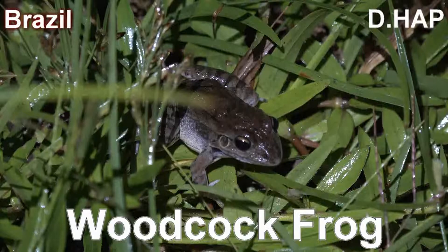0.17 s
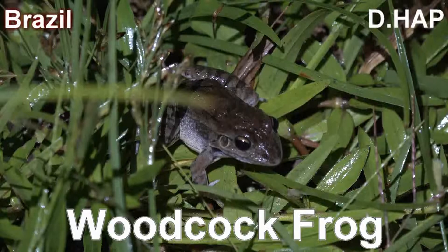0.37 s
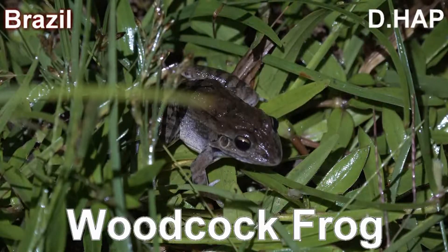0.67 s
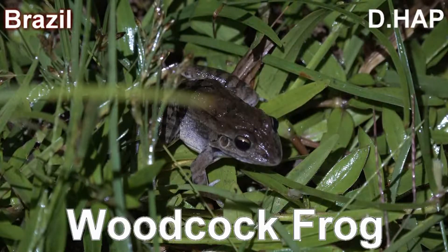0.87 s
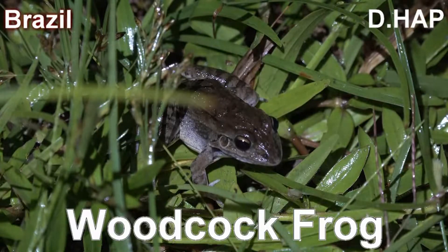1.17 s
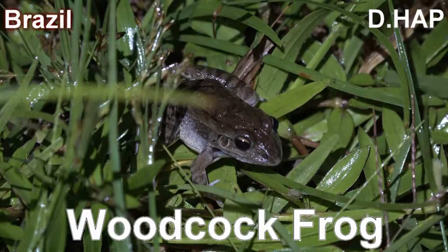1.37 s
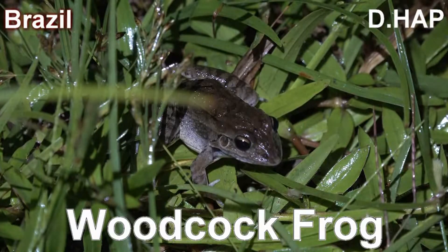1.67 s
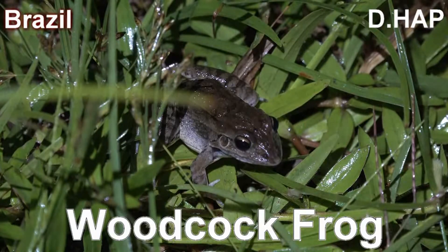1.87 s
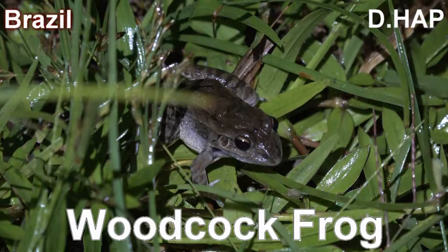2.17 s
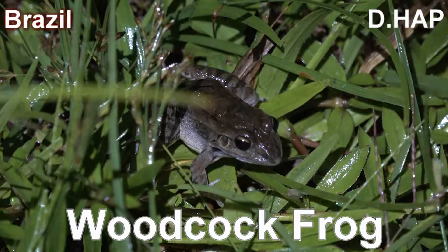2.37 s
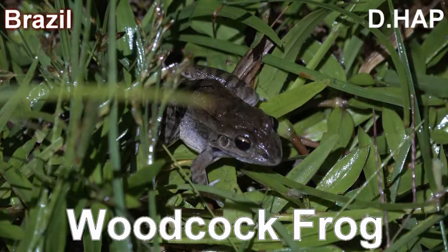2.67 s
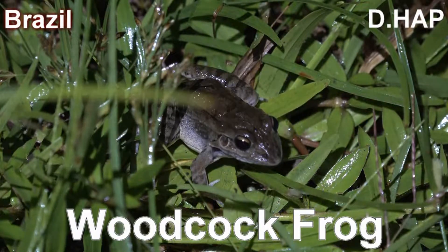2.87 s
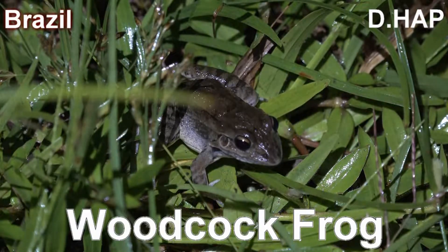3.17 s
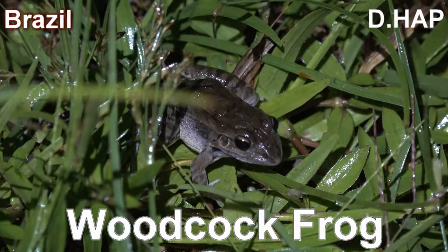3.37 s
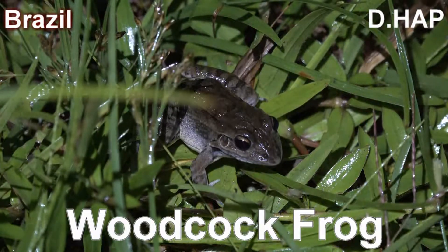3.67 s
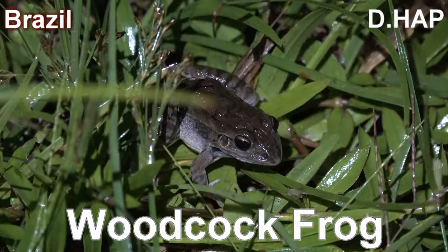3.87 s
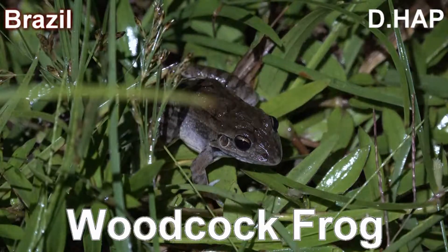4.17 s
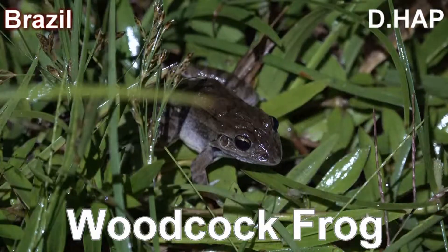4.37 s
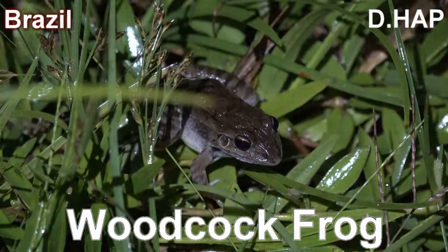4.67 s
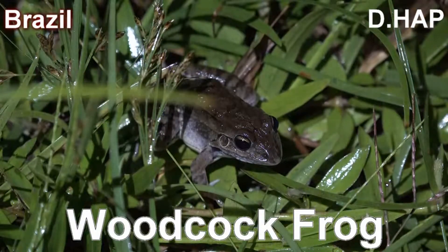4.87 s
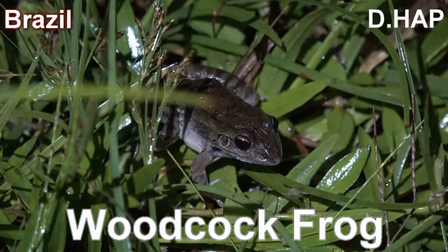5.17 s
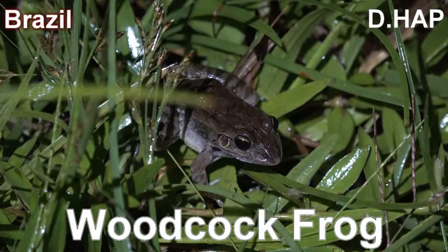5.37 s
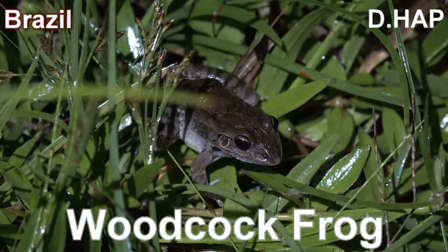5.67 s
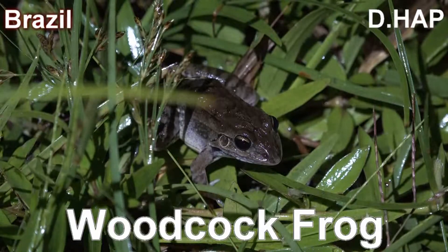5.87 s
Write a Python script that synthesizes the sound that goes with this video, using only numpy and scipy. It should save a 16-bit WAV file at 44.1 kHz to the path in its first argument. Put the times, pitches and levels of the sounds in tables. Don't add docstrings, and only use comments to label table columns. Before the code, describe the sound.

Steady high-pitched cricket and katydid chorus in wet grass at night, with two short upward frog whistles, about a second apart, late on.

```python
import sys
import numpy as np
from scipy import signal
from scipy.fft import rfft, irfft
from scipy.io import wavfile
from scipy.ndimage import uniform_filter1d

SR = 44100
rng = np.random.default_rng(int(sys.argv[2]) if len(sys.argv) > 2 else 0)


def transcribe(u):
    v = np.clip(np.atleast_2d(u).T, -1, 1)
    q = np.round(v * 32767).astype(np.int16)
    wavfile.write(sys.argv[1], SR, q)


def ratio_of_db(decibels):
    return 10 ** (np.asarray(decibels, float) / 20)


N = 265923
TIME = np.arange(N) / SR

# crest t/s, level/dB
WHISTLES = [
    (3.737, -28),
    (4.825, -28),
]
# cancelled f/Hz, level/dB
GROUND_ECHO = (1395, -3.5)
# delay t/s, level/dB
TREE_ECHOES = [
    (.05, -26),
    (.072, -29),
]


def near_frog():
    calls = sum(near_call(*row) for row in WHISTLES)
    notch_hz, echo_db = GROUND_ECHO
    delay_s = 1.5 / notch_hz
    calls = calls + ratio_of_db(echo_db) * np.interp(TIME - delay_s, TIME, calls)
    trees = sum(ratio_of_db(db) * np.interp(TIME - s, TIME, calls) for s, db in TREE_ECHOES)
    return ratio_of_db(-3) * (placed(calls, pan_db=-4, lead=3.2, wet_db=-22, t60=.3) + trees)


# t/s from the crest, f/Hz
WHISTLE_PITCH = [(-.038, 900), (-.013, 1100), (0, 1285), (.013, 1590), (.052, 2160), (.075, 2420)]
MURMUR_S, MURMUR_DB, SWELL_S, SWELL_DB = .021, -36, .017, -24
SETTLE_S, SETTLE_DB, SUSTAIN_S, SUSTAIN_DB = .018, -6, .034, -6.5
STOP_S, STOP_DB, TRAIL_S, TRAIL_DB = .004, -17, .018, -24


def near_call(s, db):
    moments = np.cumsum([-MURMUR_S - SWELL_S, MURMUR_S, SWELL_S, SETTLE_S, SUSTAIN_S, STOP_S, TRAIL_S])
    gains = ratio_of_db(np.array([MURMUR_DB, SWELL_DB, 0, SETTLE_DB, SUSTAIN_DB, STOP_DB, TRAIL_DB]))
    hz = np.interp(TIME - s, *np.transpose(WHISTLE_PITCH))
    envelope = np.interp(TIME - s, moments, gains ** .5) ** 2
    return envelope * whistle(s + moments[0], moments[-1] - moments[0], db, hz)


def whistle(s, length, level_db, hz):
    tone = np.sqrt(2) * np.sin(2 * np.pi * np.cumsum(hz) / SR)
    return ratio_of_db(level_db) * tone * (TIME > s) * (TIME < s + length)


# start t/s, end t/s, level/dB
LOW_EFFORT = [
    (0, 2.3, -47.5),
    (2.81, 7, -47),
]
# t/s, level/dB
HIGH_EFFORT = [
    (0, -47),
    (1.0, -52),
    (2.1, -48.5),
    (4.5, -45.5),
    (6.03, -47.5),
]
# from t/s, strokes per second f/Hz
LOW_TEMPO = [
    (0, 17.19),
    (2.2, 15.93),
    (3.0, 17.05),
]
HIGH_TEMPO = [
    (0, 15.77),
    (1.4, 16.8),
    (2.2, 16.12),
    (3.4, 15.52),
    (4.6, 15.78),
]
# f/Hz, width/Hz, level/dB
LOW_WING = [(8050, 1450, -4.5), (8750, 900, 0), (9980, 1440, -6), (12200, 3700, -18), (15000, 2800, -16)]
HIGH_WING = [(9560, 2400, 2), (11630, 3400, 0.5), (15300, 7900, -12)]


def katydids():
    low_db = bouts(LOW_EFFORT, .03, .06, rest_db=-70)
    low = katydid(LOW_TEMPO, .44, low_db, LOW_WING, same=.5, lead=-.4, sharp=3.0)
    high_db = curve(HIGH_EFFORT)
    return low + katydid(HIGH_TEMPO, .69, high_db, HIGH_WING, same=0.69, lead=-2.53, sharp=3.2)


def katydid(tempo, first, effort_db, wing, same, lead, sharp):
    since, rate = np.transpose(tempo)
    strokes_per_s = rate[np.searchsorted(since, TIME, "right") - 1]
    turns = first + np.cumsum(strokes_per_s) / SR
    strength = ratio_of_db(0.5 * rng.standard_normal(200))[np.round(turns).astype(int)]
    bursts = strength * (.5 + .5 * np.cos(2 * np.pi * turns)) ** sharp
    scrape = pair(same, lead) * bursts
    ring = sum(ratio_of_db(db) * resonate(scrape, hz, width) for hz, width, db in wing)
    return ratio_of_db(effort_db) * evened(ring)


BUZZ_RATES = (156.24, 165.12)
# resonance f/Hz, width/Hz, skirt level/dB, level/dB, left lead/samples
BUZZERS = [
    (6950, 600, -19, -42.5, .75),
    (7500, 300, -40, -53, .2),
]


def buzzers():
    out = np.zeros((2, N))
    for rate, (hz, width, skirt_db, db, lead) in zip(BUZZ_RATES, BUZZERS):
        turns = np.cumsum(rate * (1 + .0005 * wander(12))) / SR
        nearest = round(hz / rate)
        clicks = np.zeros(N)
        for k in range(nearest - 9, nearest + 7):
            flutter = ratio_of_db(2.5 * wander(30))
            clicks += flutter * np.cos(2 * np.pi * (k * turns + .55 * rng.random()))
        ring = evened(resonate(clicks, hz, width)) + ratio_of_db(skirt_db) * clicks
        out += placed(ratio_of_db(db) * ring, pan_db=1.1, lead=lead, wet_db=-20, t60=.1)
    return out


# start t/s, warm-up/s, end t/s, let-go/s, level/dB
TRILLS = [
    (-1.0, .3, .17, .25, -38),
    (1.02, .38, 2.095, .012, -39.5),
    (2.77, .29, 3.72, .13, -39.5),
    (4.52, .25, 5.42, .18, -40.5),
]
# t/s of one stroke, strokes per second f/Hz
TRILL_BEAT = [
    (.212, 49.4),
    (1.511, 49.27),
    (3.1015, 49.3),
    (4.904, 48.85),
]


def trill():
    out = np.zeros(N)
    for row, (s, rate) in zip(TRILLS, TRILL_BEAT):
        rows = wing_effort(*row)
        strokes = .16 + (.5 + .5 * np.cos(2 * np.pi * rate * (TIME - s))) ** 1.3
        hz = curve(rows, axis=2) * (1.002 + .003 * wander(30))
        turns = np.cumsum(hz) / SR
        tone = np.sin(2 * np.pi * turns) + .65 * np.sin(2 * np.pi * .978 * turns)
        rough = evened(resonate(rng.standard_normal(N), hz, 680))
        out += ratio_of_db(curve(rows, outside=-200)) * evened(strokes * (tone + .45 * rough))
    return placed(out, pan_db=-.7, lead=.05, wet_db=-8, t60=.12)


COLD_HZ, WARM_HZ, TIRED_HZ = 5450, 5945, 5860
COLD_DB, LET_GO_DB, DYING_S, DYING_DB = -8.5, -6.5, 0.43, -16


def wing_effort(start, warm_s, end, let_go_s, db):
    warm, rest = start + warm_s, end + let_go_s
    return [(start, db + 2 * COLD_DB, COLD_HZ),
            (start + warm_s / 4, db + COLD_DB, COLD_HZ + 40),
            (start + .62 * warm_s, db + COLD_DB + 1.5, (COLD_HZ + WARM_HZ) / 2),
            (warm, db - 2, WARM_HZ - 25),
            (warm + 0.2235, db, WARM_HZ),
            (end, db, WARM_HZ),
            (rest, db + LET_GO_DB, TIRED_HZ + 15),
            (rest + DYING_S, db + DYING_DB, TIRED_HZ)]


# first t/s, last t/s, level/dB, growth per chirp/dB
CHIRPS = [
    (.652, .939, -43, 0.0),
    (3.087, 3.228, -44.5, 0.0),
    (4.51, 4.797, -48.5, .8),
]
CHIRP_S, CHIRP_LENGTH_S, CHIRP_HZ, CHIRP_ARCH_HZ = .072, .04, 4740, 150


def chirps():
    out, u = np.zeros(N), np.linspace(0, 1, round(CHIRP_LENGTH_S * SR))
    hz = CHIRP_HZ + CHIRP_ARCH_HZ * np.sin(.8 * np.pi * u)
    tone = np.sin(2 * np.pi * np.cumsum(hz) / SR) * signal.windows.tukey(len(u), .5)
    for first, last, db, growth_db in CHIRPS:
        count = round((last - first) / CHIRP_S) + 1
        for k, s in enumerate(np.linspace(first, last, count)):
            out[round(s * SR):][:len(u)] += ratio_of_db(db - 3.5 + growth_db * k) * tone
    return placed(out, pan_db=-1.5, lead=.2, wet_db=-13, t60=.15)


# start t/s, length/s, level/dB, low f/Hz, top f/Hz
FAR_WHISTLES = [
    (.59, .12, -60.5, 1750, 2240),
    (4.62, .12, -64, 2010, 2450),
    (5.34, .14, -63.5, 2170, 2450),
    (5.96, .12, -62, 2070, 2420),
]


def far_frogs():
    out = chorus() + croak()
    calls = sum(far_call(*row) for row in FAR_WHISTLES)
    return out + placed(calls, pan_db=1.5, lead=0, wet_db=4, t60=.15)


def far_call(s, length, db, low_hz, top_hz):
    u = np.clip((TIME - s) / length, 0, 1)
    hz = low_hz + (top_hz - low_hz) * np.sin(np.pi * .7 * u)
    return whistle(s, length, db - 7 * (2 * u - 1) ** 2, hz)


# start t/s, end t/s, level/dB
LOW_CHORUS = [
    (0, .36, -62),
    (1.18, 2.15, -63.5),
    (2.92, 3.75, -62.5),
    (4.42, 5.55, -62.5),
    (5.55, 7, -66),
]


def chorus():
    out = np.zeros((2, N))
    low_db = bouts(LOW_CHORUS, 0.21, 0.059, rest_db=-92)
    high_db = -55.5 + 1.9 * wander(5)
    t, sides = np.arange(2000) / SR, np.array([[.5], [-.5]])
    for level_db, hz, spread, same in [(low_db, 1850, .04, .8), (high_db, 3650, .06, .9)]:
        pips = np.zeros((2, N))
        for shape in rng.standard_normal((12, 3)):
            pitch_hz = hz * (1 + spread * shape[0]) * (1 + 1.016 * t)
            pip = np.sin(2 * np.pi * np.cumsum(pitch_hz) / SR) * np.hanning(len(t))
            starts = (rng.random(N) < 11. / SR) * ratio_of_db(3.0 * rng.standard_normal(N))
            pips += ratio_of_db(3. * shape[1] * sides) * signal.oaconvolve(starts, pip)[:N]
        blur = resonate(pair(same), hz, 2.28 * spread * hz)
        out += ratio_of_db(level_db) * evened(0.5 * evened(pips) + evened(blur))
    held = evened(resonate(pair(0.7), 2005 + 8 * wander(2.5), 61))
    return out + ratio_of_db(low_db + 1.5 + 1.2 * wander(21)) * held


# start t/s, end t/s, level/dB
CROAK = [
    (2.26, 2.48, -55.5),
]
# f/Hz, width/Hz, level/dB
CROAK_THROAT = [(626, 35, -3), (759, 37, -4.5), (1007, 170, -2.5), (1105, 170, -1)]


def croak():
    pulses = np.diff(np.floor(np.cumsum(31 * (1 + 0.18 * wander(30))) / SR), prepend=0)
    drive = evened(pulses) + 1.6 * rng.standard_normal(N)
    voice = sum(ratio_of_db(db) * evened(resonate(drive, hz, width)) for hz, width, db in CROAK_THROAT)
    return ratio_of_db(bouts(CROAK, 0.079, 0.23, rest_db=-89, sag_db=-7)) * evened(voice)


# start t/s, end t/s, level/dB
RASPS = [
    (2.7, 2.8, -52.5),
    (4.87, 4.93, -49.5),
]


def rasps():
    scrape = evened(resonate(pair(1.0), 4570, 350))
    return ratio_of_db(bouts(RASPS, .07, .075, rest_db=-73, sag_db=-4)) * scrape


# f/Hz, spectral level/dB
SWARM = [(5100, -32), (5250, -56), (5420, -11), (5800, -5), (6250, -5), (6900, 0), (7400, 0.5), (8100, -10),
         (9500, -8), (11200, -15), (12500, -16.5), (14000, -21.5), (15000, -26), (16000, -29)]
# f/Hz, likeness
SWARM_SAME = [(5300, 0.97), (6500, 0.75), (7500, 1), (8400, 0.32), (11000, 0.55), (15000, 0.93)]
# f/Hz, left lead/rad
SWARM_LEAD = [(5300, -1.5), (7000, 0.98), (7800, 1.94), (8400, -3), (11300, -4.5), (12700, -5),
              (16000, -6.5)]


def swarm():
    return hiss(SWARM, -35.5, SWARM_SAME, SWARM_LEAD, patchy_db=0.85)


# f/Hz, spectral level/dB
AIR = [(20, -21), (40, -16), (52, 1), (90, -10.5), (160, -9), (300, -10), (560, -9), (1030, -7.5),
       (1450, -13.5), (2100, -5.5), (2750, -8), (3300, -1), (4900, -3.5), (5380, -14)]
# f/Hz, likeness
SAME = [(30, .96), (60, 0.99), (120, 0.67), (200, 0.38), (380, -0.7), (700, -0.81), (1290, -0.45),
        (2000, 0.5), (3000, 0.73), (4400, 0.76), (5300, 1)]


def air():
    return hiss(AIR, -51, SAME, [(0, 0)], patchy_db=1.0)


# start t/s, end t/s, level/dB
TRAFFIC = [
    (0, .22, -66.5),
    (1.97, 2.5, -59.5),
    (4.45, 5.18, -60),
    (5.54, 5.7, -68),
]
# start t/s, end t/s, level/dB
MOAN = [
    (.16, .5, -73),
    (1.45, 1.7, -72),
    (3.65, 3.9, -70),
]
# f/Hz, width/Hz, level/dB
DRONES = [(792.5, 76, -74), (1031, 93, -71.5)]
# f/Hz, rms level/dB
HUM = [(59.2, -74), (119.8, -65.5), (242.2, -77.5)]


def town():
    hum = np.zeros(N)
    for hz, db in HUM:
        hum += ratio_of_db(db + 0.5 * wander(8)) * np.sqrt(2) * np.sin(2 * np.pi * hz * TIME)
    beat = ratio_of_db(-73.5 + 1.7 * wander(4.5)) * np.sin(2 * np.pi * 51 * TIME)
    drones = np.zeros((2, N))
    for hz, width, db in DRONES:
        drones += ratio_of_db(db + wander(2.05)) * evened(resonate(pair(0.47), hz, width))
    moan_db = bouts(MOAN, .1, 0.11, rest_db=-102, sag_db=-4)
    moan = ratio_of_db(moan_db) * evened(resonate(pair(0.64), 469, 27))
    traffic_db = bouts(TRAFFIC, 0.13, 0.24, rest_db=-74.5) - 6.0
    traffic = ratio_of_db(traffic_db) * evened(resonate(pair(0.62), 310, 184))
    return hum + beat + drones + moan + traffic


def hiss(spectrum, level_db, likeness, lead, patchy_db):
    frames, hz = N // 512 + 5, np.fft.rfftfreq(2048, 1 / SR)
    a, b, c, d, patches = rng.standard_normal((frames, 1025, 5)).T
    patches = evened(uniform_filter1d(uniform_filter1d(patches, 20, 0), 8, 1))
    same, left = np.clip(read(likeness, hz), -1, 1)[:, None], a + 1j * b
    late = left * np.exp(-1j * read(lead, hz))[:, None]
    z = np.array([left, same * late + np.sqrt(1 - same ** 2) * (c + 1j * d)])
    in_band = (hz <= spectrum[-1][0])[:, None]
    z *= ratio_of_db(read(spectrum, hz)[:, None] + patchy_db * patches) * in_band
    return ratio_of_db(level_db) * evened(signal.istft(z, nperseg=2048, noverlap=1536)[1][:, :N])


def placed(x, pan_db, lead, wet_db, t60):
    hz = np.fft.rfftfreq(N, 1 / SR)
    side = np.array([[.5], [-.5]])
    direct = irfft(rfft(x) * ratio_of_db(pan_db * side) * np.exp(2j * np.pi * hz * lead * side / SR), N)
    t = np.arange(SR // 2) / SR
    tail = rng.standard_normal((2, len(t))) * ratio_of_db(-60 * t / t60) * (t > .004)
    scatter = signal.fftconvolve(x[None], tail / np.linalg.norm(tail[0]), axes=1)[:, :N]
    return direct + ratio_of_db(wet_db) * scatter


def pair(same, lead=0):
    a, b = rng.standard_normal((2, N))
    same = np.clip(same, -1, 1)
    late = irfft(rfft(a) * np.exp(-2j * np.pi * np.fft.rfftfreq(N) * lead), N)
    return np.array([a, same * late + np.sqrt(1 - same ** 2) * b])


def resonate(x, hz, width):
    turn = np.exp(2j * np.pi * np.cumsum(hz * np.ones(N)) / SR)
    r = np.exp(-np.pi * width / SR)
    return 2 * (turn * signal.lfilter([(1 - r) ** 2], [1, -2 * r, r * r], x / turn)).real


def bouts(rows, rise_s, fall_s, rest_db, sag_db=0):
    levels = []
    for a, b, db in rows:
        moments = [a - rise_s, a, b, b + fall_s]
        levels.append(np.interp(TIME, moments, [rest_db, db, db + sag_db, rest_db]))
    return np.max(levels, axis=0)


def wander(rate):
    t = TIME[::256]
    slow = np.zeros(len(t))
    for f in np.geomspace(rate / 20, rate, 16):
        slow += np.sin(2 * np.pi * (f * t + rng.random())) / np.sqrt(f)
    return np.interp(TIME, t, evened(slow))


def evened(x):
    return x / np.sqrt(np.mean(x ** 2) + 1e-20)


def read(points, hz):
    f, value = np.transpose(points)
    return np.interp(np.log(hz + 1), np.log(f + 1), value)


def curve(rows, axis=1, outside=None):
    rows = np.array(rows)
    return np.interp(TIME, rows[:, 0], rows[:, axis], outside, outside)


def scene():
    callers = near_frog() + katydids() + buzzers() + trill() + chirps() + far_frogs() + rasps()
    return callers + swarm() + air() + town()


def top_cut(x):
    return signal.sosfilt(signal.butter(12, 16430, fs=SR, output="sos"), x)


def record(dry):
    low_pass = signal.firwin(511, 15800, window=("kaiser", 9), fs=SR)
    limited = signal.oaconvolve(dry, low_pass[None], "same")
    opening = np.clip((TIME - .157) / 0.00061, 0, 1)
    return top_cut(limited * opening)


dry = scene()
out = record(dry)
transcribe(out)
```